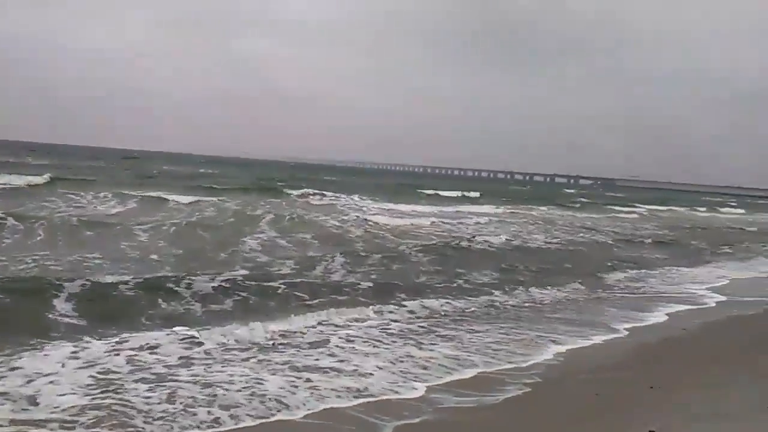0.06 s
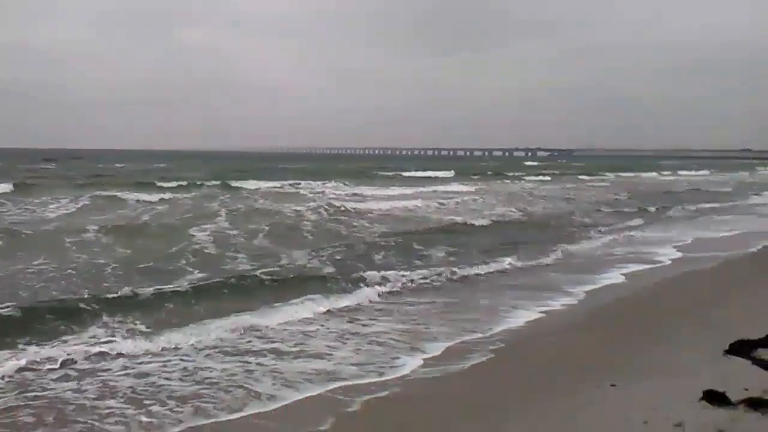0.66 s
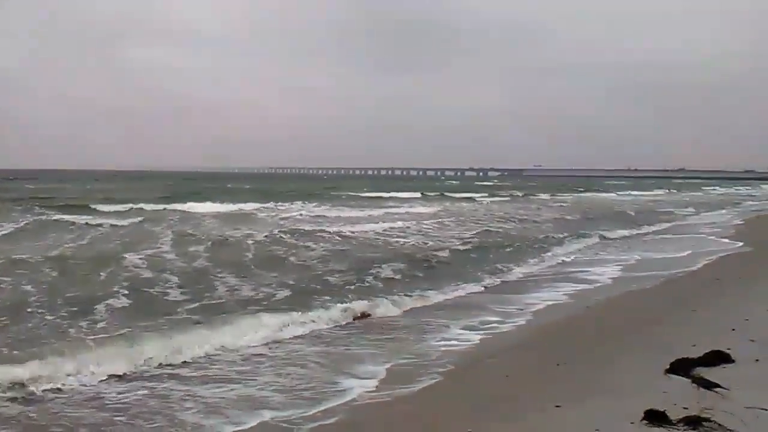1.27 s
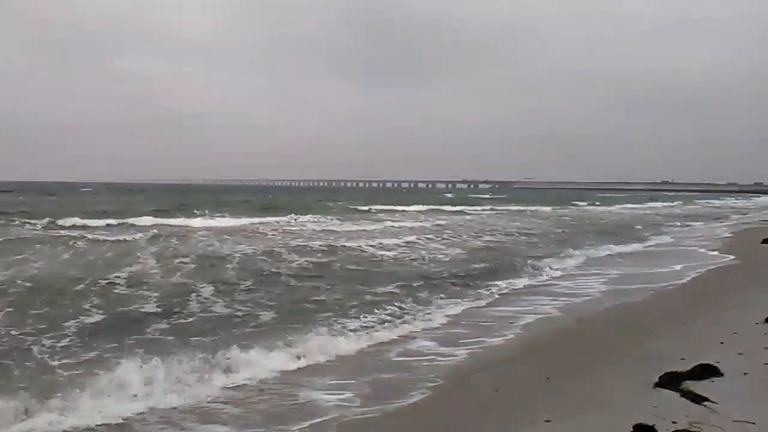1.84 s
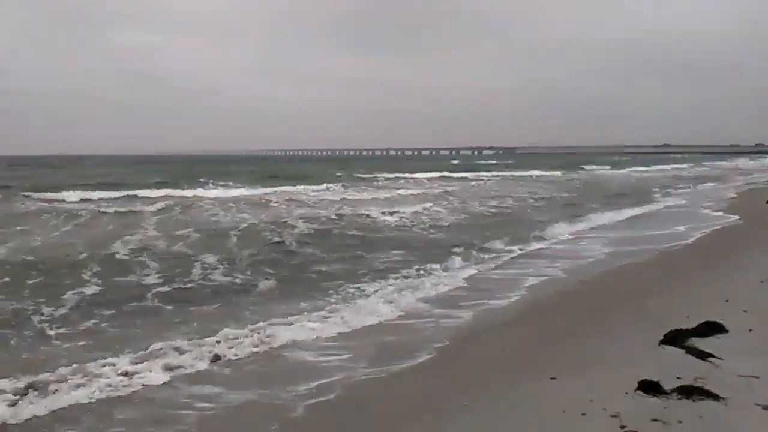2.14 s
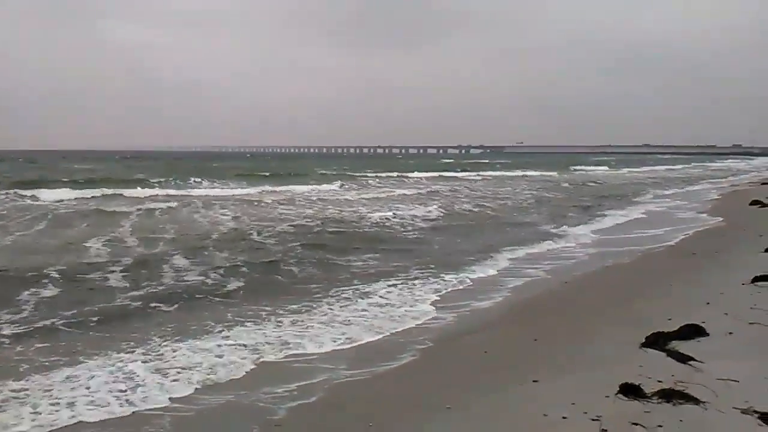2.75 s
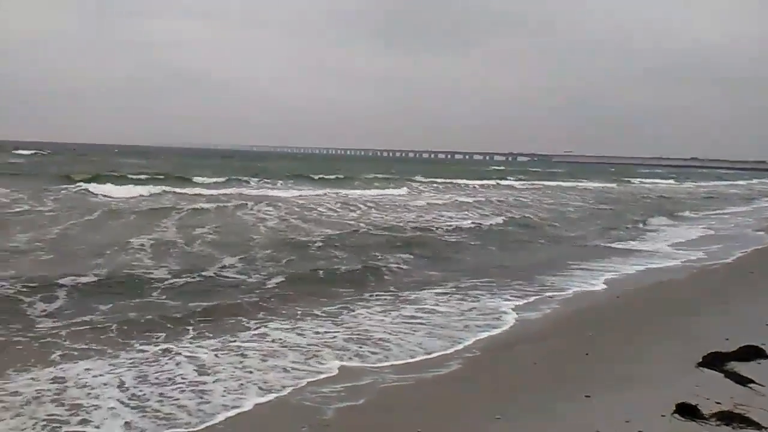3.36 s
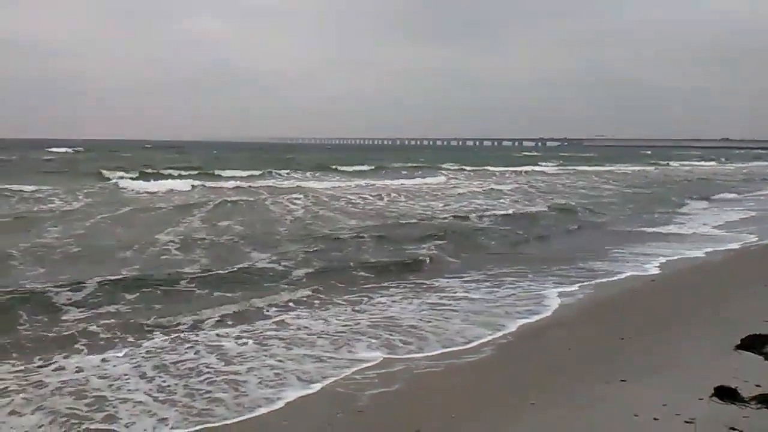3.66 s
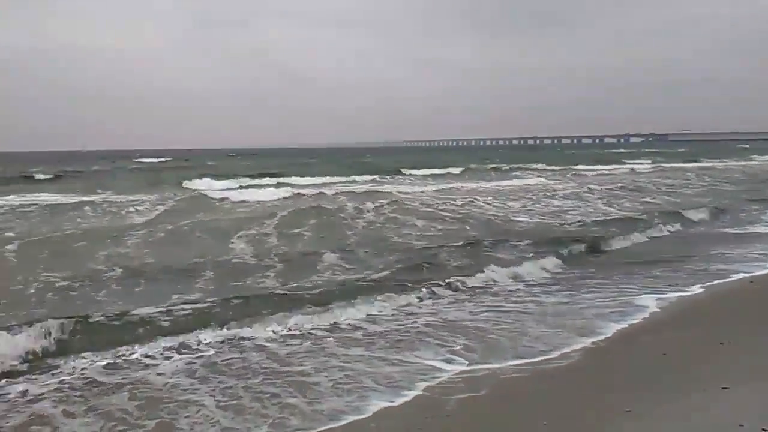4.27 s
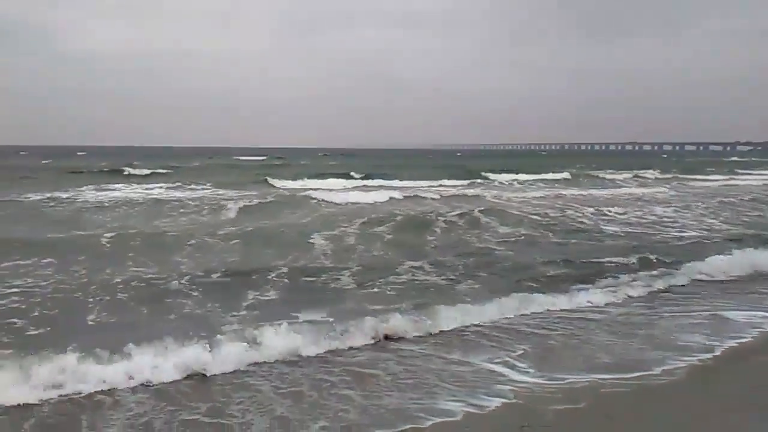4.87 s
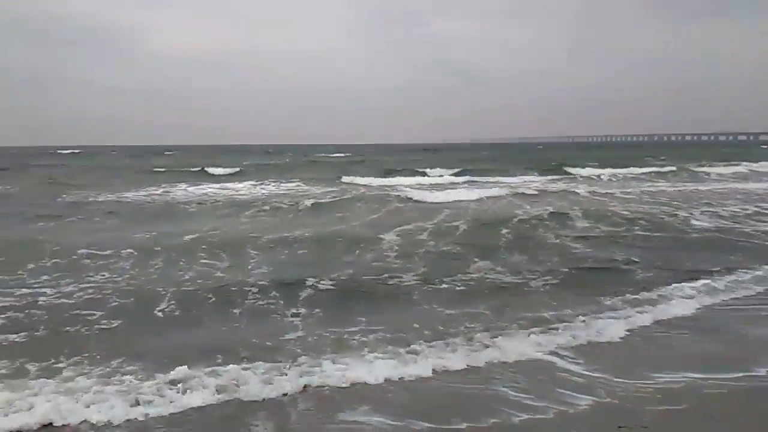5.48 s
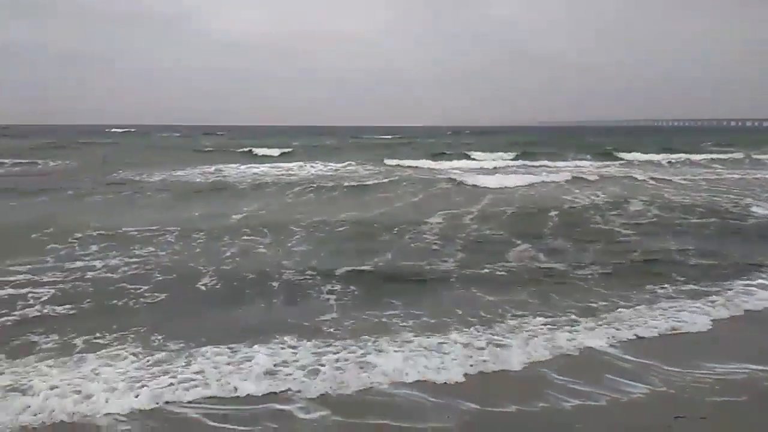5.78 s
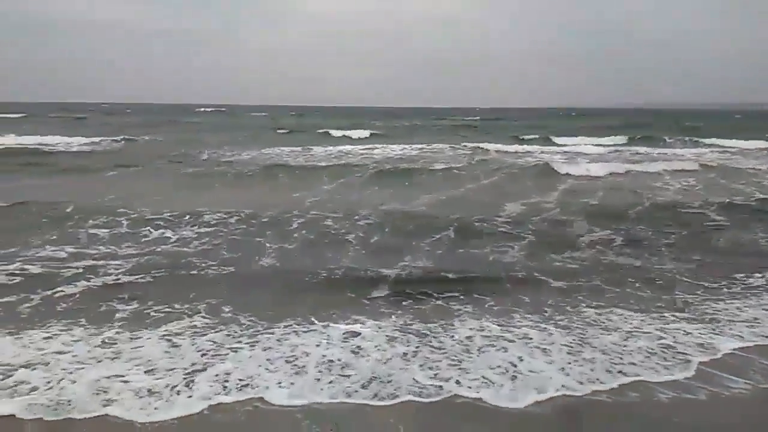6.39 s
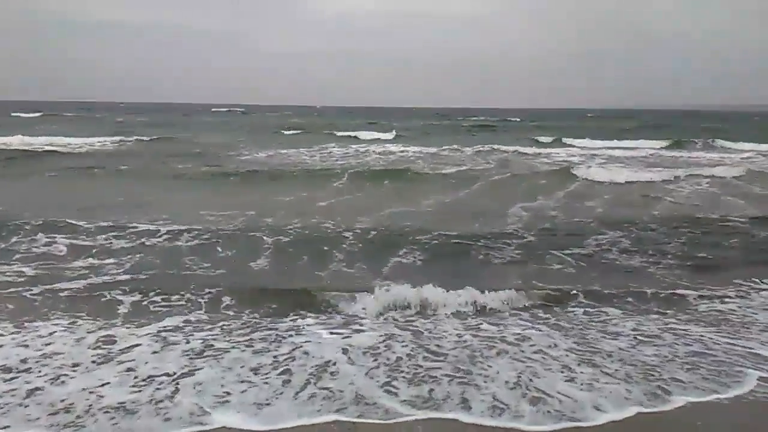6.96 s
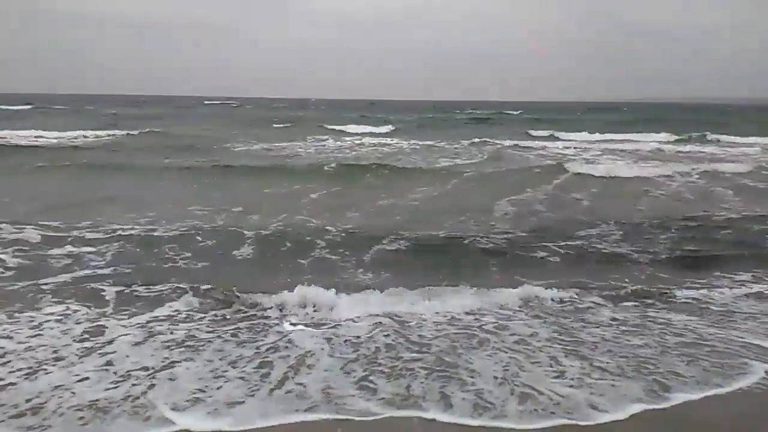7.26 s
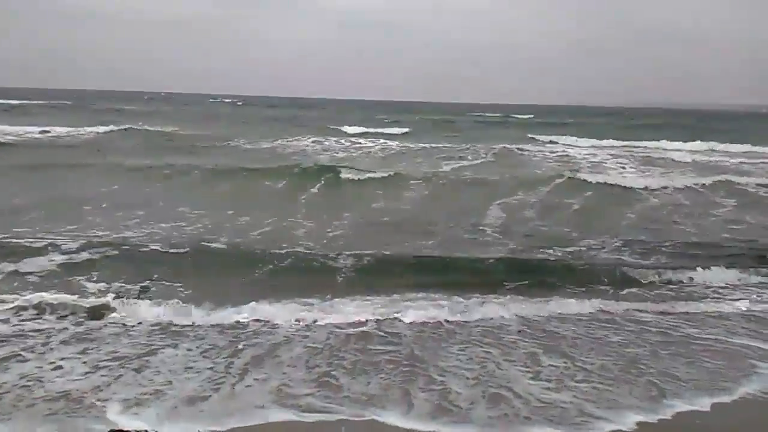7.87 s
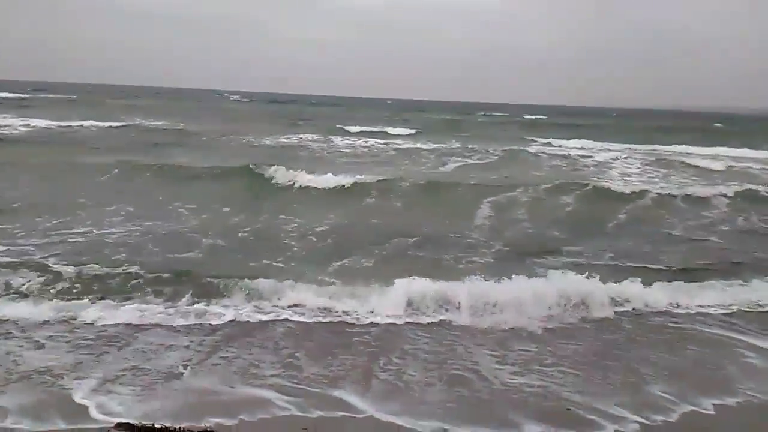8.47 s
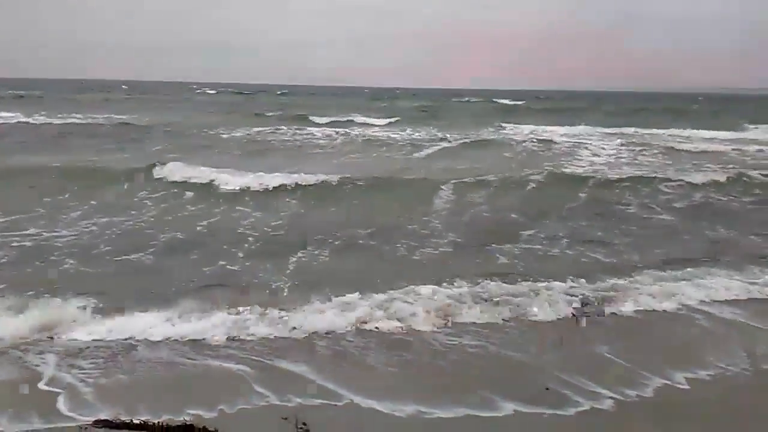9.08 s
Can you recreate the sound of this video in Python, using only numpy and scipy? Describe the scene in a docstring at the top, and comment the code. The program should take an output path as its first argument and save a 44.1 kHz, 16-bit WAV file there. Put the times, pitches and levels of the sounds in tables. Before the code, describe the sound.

Strong gusty wind rumbles and knocks on the microphone while small waves break and hiss up a sandy beach.

```python
"""A strong wind buffets a hand-held microphone while small waves break and wash up a sandy beach.
The wind is made of eddies (swirls of air): in the microphone's opening, large ones rumble, middle
ones flutter and small ones rasp. It swells in short gusts, and single hard eddies knock.
Each breaking wave swells into a hiss of bubbles and spray over the steady wash of the sea."""
import sys
import numpy as np
from scipy import signal
from scipy.fft import rfft, irfft, next_fast_len
from scipy.io import wavfile
from scipy.ndimage import uniform_filter1d, minimum_filter1d

SR = 44100
rng = np.random.default_rng(int(sys.argv[2]) if len(sys.argv) > 2 else 0)


def to_wav(sig):
    """Store sig (one row per channel, or 1-D mono) as 16-bit WAV at the path in sys.argv[1].

    Samples outside -1..1 are clipped; the rate is SR.
    """
    pcm = np.clip(np.atleast_2d(sig), -1, 1) * 32767
    pcm = np.round(pcm).astype(np.int16)
    wavfile.write(sys.argv[1], SR, pcm.T)  # frames by channels


N = 402633

# Waves breaking near the shore:
# t/s, build-up/s, tumbling/s, foam fade/(dB per s), crest rush/dB, foam fizz/dB, spray/dB
BREAKERS = [(0.93, 0.43, 0.85, 11.5, -41.5, -41, -58.5), (3.42, 0.6, 0.99, 14, -42, -43.5, -63.5),
            (4.55, 0.42, 0.61, 21, -43, -44, -59), (6.93, 0.32, 1, 12, -48.5, -50.5, -69.5),
            (8.08, 0.55, 0.55, 13, -42, -42.5, -57.5)]
# Slabs of water slapping down: t/s, relative slap level/dB, spray level/dB
SPLASHES = [(1.04, -41, -75), (1.68, -34, -58), (2.108, -36, -57), (4.74, -37, -57), (4.91, -35.5, -55),
            (5.35, -39, -61), (7.45, -60, -63), (8.265, -39.5, -57), (8.42, -47, -58), (8.58, -51, -55),
            (8.87, -43, -56)]


def wind():
    """Eddies of three sizes push on the microphone in shared puffs; small ones are the most fitful."""
    # Tone of the large, middle and small eddies: f/Hz, relative level/dB
    rumble_tone = [(15, -56), (25, -37.5), (38, -6), (52, 2), (65, 5.5), (90, 2.5), (120, -0.5), (170, -9),
                   (260, -24.5), (500, -48), (1000, -94)]
    flutter_tone = [(50, -43), (120, -0.5), (190, 2.5), (270, 1), (380, -3), (520, -8.5), (750, -26),
                    (1300, -48.5), (3000, -86)]
    rasp_tone = [(150, -35.5), (380, -9.5), (560, 4.5), (780, 0), (1000, -5), (1400, -18.5), (2000, -33),
                 (3000, -38), (8000, -72.5)]
    large_db, middle_db, small_db = eddy_levels()
    puff = wobble(low_hz=3.7, high_hz=18.4)
    burst = wobble(low_hz=3.3, high_hz=54)
    fitful = wobble(low_hz=7.4, high_hz=80)
    pressure = noise()
    rumble = steadied(colour(pressure * amp(0.73 * burst), rumble_tone), seconds=0.087)
    flutter = steadied(colour(pressure * amp(2.47 * burst), flutter_tone), seconds=0.13)
    rasp = steadied(colour(noise() * amp(1.2 * burst + 2.65 * fitful), rasp_tone), seconds=0.032)
    return (rumble * amp(large_db - 1.1 + 2.16 * puff)
            + flutter * amp(middle_db - 4.1 + 2.6 * puff)
            + rasp * amp(small_db - 4 + 1.77 * puff))


def eddy_levels():
    """Strength in dB of the large, middle and small eddies: each gust lifts or dips it in an arch."""
    # Strength of the wind between gusts: t/s, large eddies/dB, middle eddies/dB, small eddies/dB
    between_gusts = [(0.0, -14.5, -14.5, -24.5), (0.2, -20.5, -18.5, -26), (0.9, -21.5, -20.5, -29.5),
                     (1.25, -24, -21.5, -27.5), (1.6, -21.5, -24.5, -29), (2.15, -26, -19.5, -27.5),
                     (2.62, -25.5, -23.5, -34.0), (3.2, -23, -25, -35), (3.6, -25, -29, -37),
                     (3.95, -24, -23.5, -35.5), (4.7, -28, -26.5, -35), (4.95, -22.0, -21.5, -30),
                     (5.68, -27, -34, -38.5), (5.9, -24.5, -26.5, -41), (6.9, -19.5, -25.5, -38.5),
                     (7.5, -24, -35, -47), (8.1, -27.5, -30, -41.5), (8.6, -30.5, -34.5, -46),
                     (9.13, -21.5, -24.5, -31)]
    # Gusts that swell and pass: peak t/s, length/s, lift of large eddies/dB, lift of the others/dB
    gusts = [(1.892, 0.098, 13, 0.5), (2.325, 0.36, 6.5, -4), (3.257, 0.2, 4.5, 1.5),
             (4.482, 0.13, 8, -0.5), (4.605, 0.066, 5.5, 1.5), (5.474, 0.084, 8, 4.0), (5.89, 0.64, 4, 3),
             (6.112, 0.11, 4, 7.5), (6.215, 0.22, 6.5, 3), (6.391, 0.071, 4, 7.5), (6.707, 0.091, 4, 8.5),
             (6.925, 0.066, 10, 5.5), (7.434, 0.22, 0.0, 8.5), (7.705, 0.27, 5.5, 9.0),
             (7.864, 0.092, 6.5, 10), (7.998, 0.2, 6.5, 0.5), (8.247, 0.45, 4.5, 8), (8.46, 0.18, 11, 9),
             (8.619, 0.29, 11, 13.0), (8.901, 0.12, 9.5, 2.5)]
    large_db, middle_db, small_db = curves(between_gusts)
    for s, length, large_lift, lift in gusts:
        arch = np.hanning(int(length * SR))
        add(large_db, s - length / 2, large_lift * arch)
        add(middle_db, s - length / 2, lift * arch)
        add(small_db, s - length / 2, lift * arch)
    return large_db, middle_db, small_db


def knocks():
    """A hard eddy swings the air pressure one way and back, and trails a brief flurry of noise."""
    # The hardest single eddies: t/s, peak level/dB, centre f/Hz
    hard_eddies = [(0.106, -6, 539), (0.157, -10, 570), (0.178, -6, 439), (0.24, -8.5, 396),
                   (0.312, -10, 543), (0.43, -8, 480), (0.545, -13, 486), (0.617, -2.5, 103),
                   (0.738, -12, 396), (1.011, -12, 260), (1.03, -11.5, 670), (1.81, -9.5, 396),
                   (1.882, -7.5, 92), (2.124, -9.5, 504), (2.302, -15.5, 136), (2.338, -12, 139),
                   (2.398, -10.5, 356), (2.502, -10, 460), (2.83, -14.5, 486), (2.994, -13, 760),
                   (3.003, -10, 149), (3.142, -9.5, 447), (3.27, -11.5, 156), (3.394, -11, 139),
                   (4.272, -16, 439), (4.306, -15, 376), (4.415, -17, 447), (4.604, -14, 410),
                   (4.976, -12, 750), (5.063, -7.5, 390), (5.23, -10, 138), (5.625, -14, 610),
                   (5.781, -13.5, 310), (5.857, -10, 262), (5.909, -13, 150), (5.928, -7, 102),
                   (6.077, -9.5, 574), (6.123, -11.5, 417), (6.152, -9, 139), (6.168, -12.5, 460),
                   (6.398, -10.5, 340), (6.41, -11, 105), (6.62, -9.5, 372), (6.689, -10, 283),
                   (6.704, -5, 143), (6.752, -6.5, 142), (6.9, -9, 305), (6.927, -16.5, 404),
                   (7.696, -16, 358), (8.581, -13.5, 453), (8.66, -11, 364), (8.884, -14, 353)]
    # Tone of the flurry: f/Hz, relative level/dB
    flurry_tone = [(60, -16), (200, -5.5), (600, 2.5), (1100, -19.5), (2000, -33.5), (6000, -62.5)]
    rise_s, fade_s = 0.0016, 0.0073
    out, t = np.zeros(N), np.arange(-900, 2600) / SR
    flurry = colour(noise(), flurry_tone)
    flurry_shape = np.clip(t / rise_s, 0, 1) * np.exp(-abs(t) / fade_s)
    eddies = hard_eddies + small_knocks()
    for (s, db, hz), sign in zip(eddies, rng.choice([-1, 1], len(eddies))):
        phase = 2 * np.pi * hz * t
        swing = phase / (1 + (phase / 3) ** 2) ** 4
        trail = flurry_shape * flurry.take(round(s * SR) + np.arange(len(t)), mode="wrap")
        shed = amp(-11.5) * min(hz / 400, 1)  # small fast eddies shed the most
        add(out, s + t[0], amp(db) * (sign * swing / abs(swing).max() + shed * trail))
    return filtered(out, 1 / np.sqrt(1 + (bins() / 1500) ** 8))  # dull above 1500 Hz


def small_knocks(per_s=4, above_wind_db=15, spread_db=3, middle_hz=470):
    """Lesser eddies hit at random, harder in stronger wind. Gives rows of t/s, level/dB, f/Hz."""
    small_db, rows = eddy_levels()[2], []
    for when, force, pitch in rng.random((round(per_s * N / SR), 3)):
        db = small_db[int(when * N)] + above_wind_db + spread_db * (2 * force - 1)
        rows.append((when * N / SR, db, middle_hz * 2 ** (pitch - 0.5)))
    return rows


def spurts(width_hz=320):
    """A fast wind sheds the finest eddies in hollow spurts that grow faster than the rasp."""
    small_db, out = eddy_levels()[2], np.zeros(N)
    for hz in (1240, 1360, 1853):
        band = filtered(noise(), np.exp(-((bins() - hz) / width_hz) ** 2))
        flicker_db = 7.2 * np.minimum(wobble(low_hz=5.4, high_hz=50), 2.2)
        out += unit(band * amp(flicker_db)) / hz ** 2.8
    growth_db = np.minimum(3 * (small_db + 27), 6)  # 3 dB for each dB of wind, up to a ceiling
    return unit(out) * amp(-43 + growth_db)


def surf():
    """The crest tumbles with a rush of bubbles, the foam fizzes after it, and spray hisses on top."""
    # Tone of the crest, the foam and the spray: f/Hz, relative level/dB
    rush_tone = [(150, -5.5), (400, -11), (900, 3.5), (1500, 2), (2100, 0.5), (2900, -0.5), (3600, -6.5),
                 (4300, -10.5), (5200, -10.5), (6300, -26), (8000, -37), (14000, -50)]
    fizz_tone = [(1500, -20), (2800, -7.5), (3500, -0.5), (4000, -0.5), (4600, 0.5), (5200, -4),
                 (6300, -13.5), (8000, -27.5), (14000, -48.5)]
    spray_tone = [(2000, -17.5), (4500, 3), (7000, 3.5), (9000, -1), (11000, -4), (14000, -6.5)]
    rush_gain, fizz_gain, spray_gain = surf_levels()
    tumble = wobble(low_hz=2.5, high_hz=25)
    churn = patches(noise() + amp(-12) * bubbles(per_s=2500, cycles=5.1), depth_db=1.6)
    rush = mic_opening(colour(churn, rush_tone)) * rush_gain * amp(0.25 * tumble)
    foam = patches(noise(), depth_db=1.63)
    fizz = mic_opening(colour(foam, fizz_tone)) * fizz_gain * amp(0.61 * tumble)
    drops = patches(noise() + amp(-5) * pops(per_s=1700, spread_db=1), depth_db=2.0)
    spray = colour(drops, spray_tone) * spray_gain * amp(0.79 * tumble)
    return rush + fizz + spray


def surf_levels():
    """Gains of rush, fizz and spray: the wash between waves, breakers and splashes add their power."""
    *_, rush_db, fizz_db, spray_db = np.transpose(BREAKERS)
    _, slap_db, thrown_db = np.transpose(SPLASHES)
    rush = amp(-53.5) ** 2 + breaking(rush_db, fade_ratio=1.23) + splashing(slap_db - 5)
    fizz = amp(-52) ** 2 + breaking(fizz_db, lag_s=0.021) + splashing(slap_db - 3.5)
    spray = amp(-69.5) ** 2 + breaking(spray_db, lag_s=0.05, fade_ratio=3.3, growth=1.9)
    spray += splashing(thrown_db)
    return np.sqrt([rush, fizz, spray])


def breaking(levels_db, lag_s=0, fade_ratio=1, growth=1):
    """Total power of the breakers: each builds up, tumbles for a while, and dies away up the sand."""
    power = np.zeros(N)
    for (s, build, tumble, fade, *_), db in zip(BREAKERS, levels_db):
        t = np.arange(N) / SR - s - lag_s
        swell = np.clip(t / build, 0, 1) ** growth
        faded_db = fade_ratio * fade * np.maximum(t - build - tumble, 0)
        power += (swell * amp(db - faded_db)) ** 2
    return power


def splashing(levels_db, rise_s=0.037, fade_s=0.1):
    """Total power of the splashes: each rises quickly and falls off."""
    power, t = np.zeros(N), np.arange(-rise_s, 1, 1 / SR)
    shape = np.clip(1 + t / rise_s, 0, 1) * np.exp(-np.maximum(t, 0) / fade_s)
    for (s, *_), db in zip(SPLASHES, levels_db):
        add(power, s - rise_s, (amp(db) * shape) ** 2)
    return power


def bubbles(per_s, cycles, sizes=28):
    """A breaking wave traps air: each size of bubble rings at its own pitch for a few cycles."""
    out, t = np.zeros(N), np.arange(800) / SR
    for hz in np.geomspace(900, 7000, sizes):
        ring = unit(np.exp(-t * hz / cycles) * np.sin(2 * np.pi * hz * t))
        out += np.sqrt(hz) * signal.oaconvolve(pops(per_s / sizes, spread_db=5.0), ring)[:N]
    return unit(out)


def patches(x, depth_db):
    """Splashes here and there make shifting bands of pitch louder and softer."""
    grid = signal.stft(x, nperseg=512, noverlap=384)[2]  # the sound laid out by pitch and time
    field = uniform_filter1d(rng.standard_normal(grid.shape), size=9, axis=0)
    field = unit(uniform_filter1d(field, size=14, axis=1))
    return unit(signal.istft(grid * amp(depth_db * field), nperseg=512, noverlap=384)[1][:N])


def sea():
    """Far rows of breakers merge into one even wash."""
    # Tone of the distant breakers: f/Hz, relative level/dB
    sea_tone = [(100, -4), (400, -6), (900, -9.5), (1500, 1), (2500, -4), (4300, -14), (6000, -21.5),
                (9000, -34.5), (14000, -46.5)]
    return amp(-52.5) * mic_opening(colour(noise(), sea_tone))


def whine():
    """The electronics give a thin high whistle, barely there."""
    # Pure tones of the whistle: f/Hz, level/dB
    whistles = [(13319, -88.5), (13379, -90.5)]
    t = np.arange(N) / SR
    return sum(amp(db) * unit(np.sin(2 * np.pi * (hz * t + rng.random()))) for hz, db in whistles)


def mic_opening(x, hz=4190, width_hz=970, lift_db=7):
    """The air in the microphone's opening rings and lifts a narrow band of the hiss."""
    peak = 1 / (1 + (2 * (bins() - hz) / width_hz) ** 2)
    return unit(filtered(x, 1 + (amp(lift_db) - 1) * peak))


def noise():
    """A plain, even hiss."""
    return rng.standard_normal(N)


def pops(per_s, spread_db):
    """Random clicks, most of them small and a few large."""
    chance, size, sign = rng.random(N), rng.exponential(1, N), rng.choice([-1, 1], N)
    return unit((chance < per_s / SR) * sign * amp(spread_db * np.minimum(size, 4)))


def wobble(low_hz, high_hz):
    """A random wavering between two rates."""
    hz = bins() + 1e-3
    return unit(filtered(noise(), 1 / np.sqrt((1 + (hz / high_hz) ** 4) * (1 + (low_hz / hz) ** 4))))


def steadied(x, seconds):
    """Takes out the slow swings of level and keeps the fast ones."""
    power = uniform_filter1d(x ** 2, int(seconds * SR))
    return x / np.sqrt(uniform_filter1d(power, int(seconds * SR / 2)) + 1e-9)


def colour(x, tone):
    """Shapes x by rows of f/Hz, level/dB, then sets its average level to one."""
    hz, db = np.transpose(tone)
    return unit(filtered(x, amp(np.interp(np.log(bins() + 1), np.log(hz), db))))


def filtered(x, gain):
    """Turns each frequency up or down by its own gain."""
    return irfft(rfft(x, next_fast_len(N)) * gain, next_fast_len(N))[:N]


def bins():
    """The frequencies in Hz that filtered() works on."""
    return np.fft.rfftfreq(next_fast_len(N), 1 / SR)


def curves(rows):
    """Joins the rows of a table over time with straight lines, one curve a column."""
    s, *columns = np.transpose(rows)
    return [np.interp(np.arange(N) / SR, s, column) for column in columns]


def add(mix, s, sound):
    """Mixes a sound in at s seconds."""
    part = mix[max(round(s * SR), 0):][:len(sound)]
    part += sound[:len(part)]


def amp(db):
    """Turns decibels into a gain, a number to multiply by."""
    return 10 ** (np.asarray(db) / 20)


def unit(x):
    """Scales x to an average (rms) level of one."""
    return x / np.sqrt(np.mean(x ** 2) + 1e-20)


def scene():
    """Water and wind at one microphone."""
    return (surf() + sea() + wind() + spurts() + knocks() + whine())[None]


def record(dry):
    """The microphone loses the deepest bass and top treble; a limiter turns the loudest moments down."""
    bass_hz, treble_hz, limit_db, recovery_db_per_s = 33, 14250, -6.93, 37
    heard = filtered(dry[0], (bins() / bass_hz) ** 4 / np.sqrt(1 + (bins() / bass_hz) ** 8))
    over_db = np.maximum(20 * np.log10(abs(heard) + 1e-9) - limit_db, 0)
    recovery_db = np.arange(N) * recovery_db_per_s / SR
    held_db = np.maximum.accumulate(over_db + recovery_db) - recovery_db  # grabs fast, lets go slowly
    duck_db = uniform_filter1d(minimum_filter1d(-held_db, size=160), size=160)
    treble_cut = signal.firwin(511, treble_hz, window=("kaiser", 9), fs=SR)
    return signal.oaconvolve(heard * amp(duck_db), treble_cut, "same")[None]


dry = scene()
out = record(dry)
to_wav(out)
```